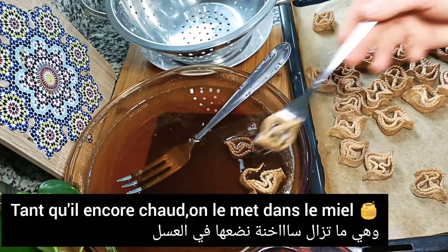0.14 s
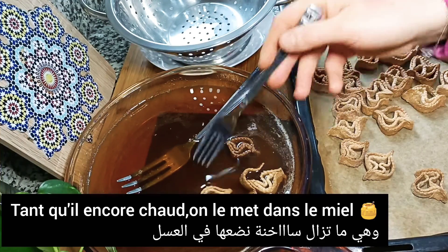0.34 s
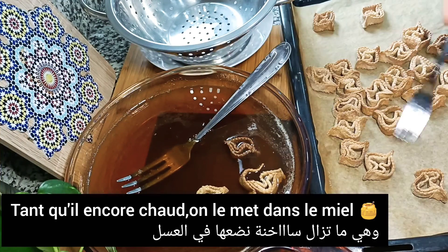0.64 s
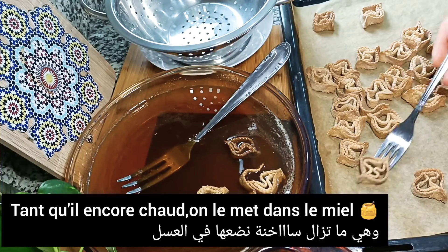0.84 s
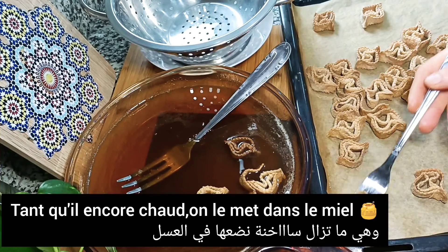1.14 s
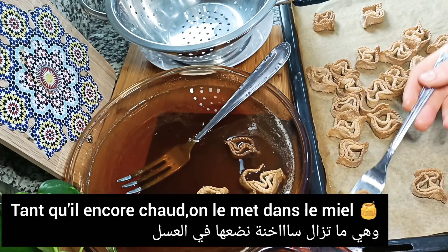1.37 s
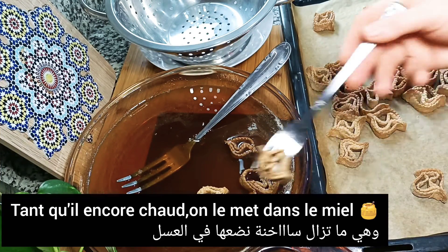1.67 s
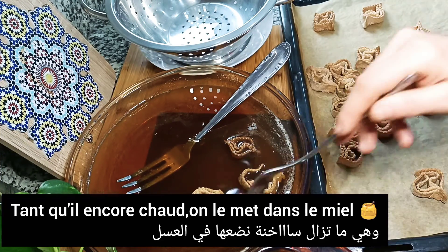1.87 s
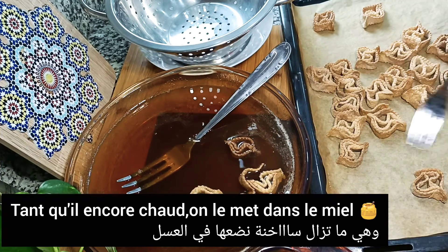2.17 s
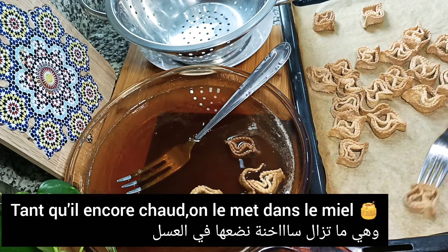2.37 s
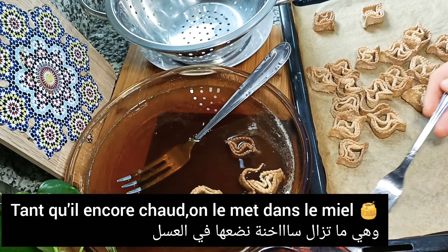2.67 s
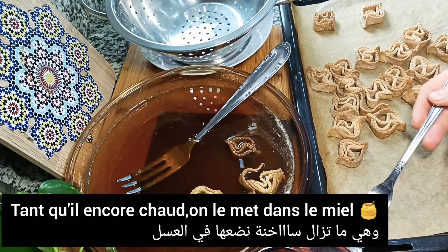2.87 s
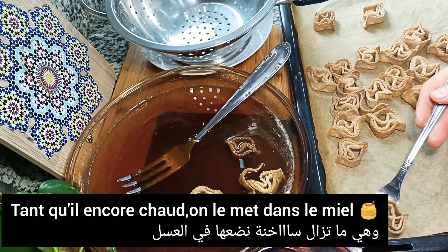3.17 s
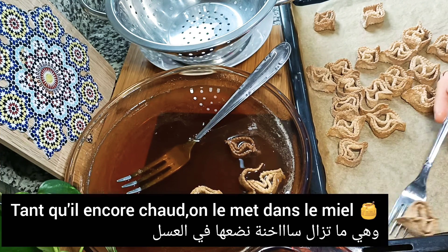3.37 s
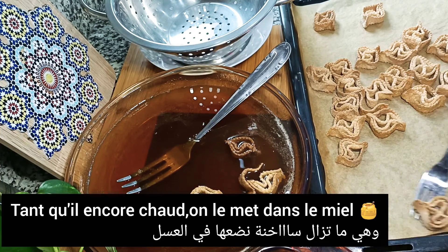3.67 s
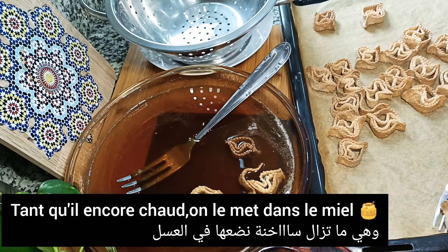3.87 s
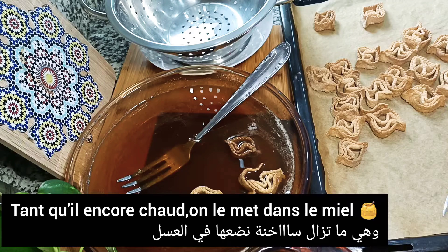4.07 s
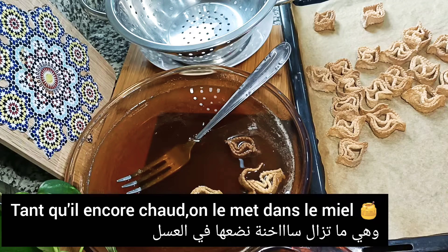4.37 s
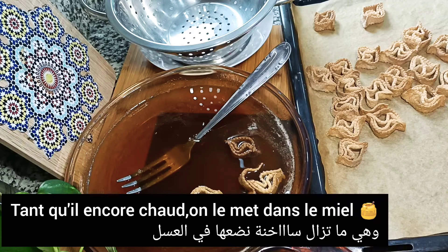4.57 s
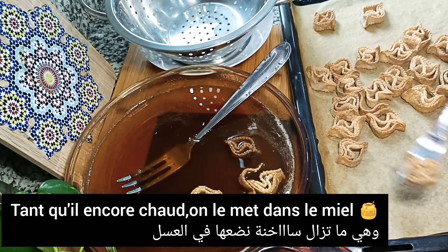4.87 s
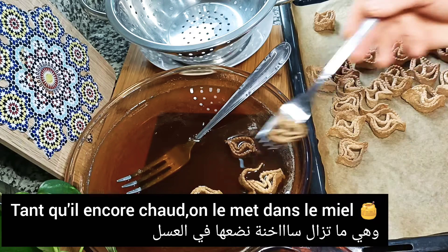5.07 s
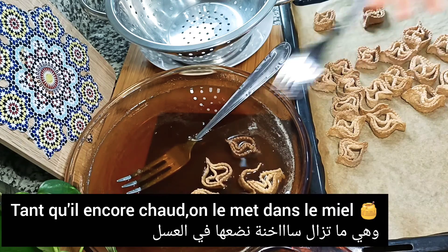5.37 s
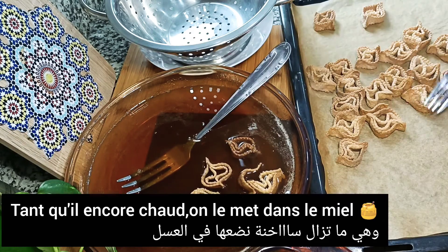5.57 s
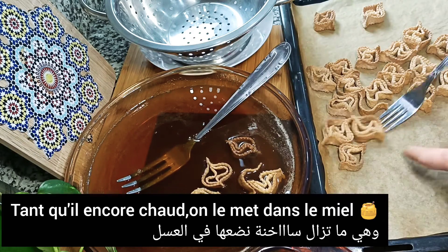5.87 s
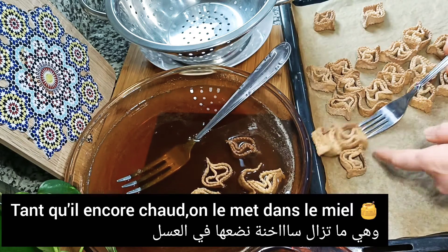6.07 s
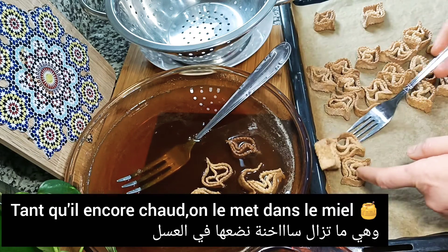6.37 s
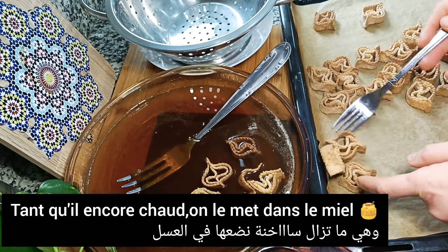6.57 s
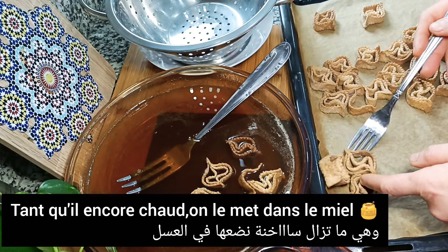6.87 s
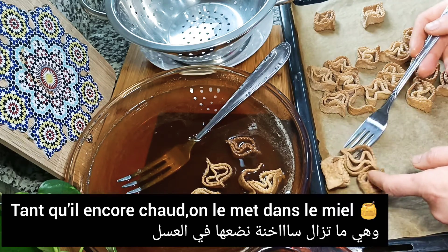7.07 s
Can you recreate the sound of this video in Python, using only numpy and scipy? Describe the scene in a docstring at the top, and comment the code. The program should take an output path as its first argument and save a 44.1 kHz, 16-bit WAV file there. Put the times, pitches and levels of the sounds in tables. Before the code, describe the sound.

A quiet small kitchen with faint low appliance hum and soft room noise, heard close in bright stereo. The first 0.7 s is almost silent but for a barely perceptible wet touch near 0.4. At 0.74 a fork knocks and scrapes a thin metal tray through parchment; the paper rustles, then snaps sharply from 1.1 to 1.4. Near quiet follows, with tiny ticks around 1.9. At 2.32 light fork clinks and a scrape begin a denser bout: crackling paper, hard crease snaps clustered around 2.85, then separate ticks, small clinks and tray bumps at 3.25, 3.6, 3.8 and 4.04. It falls quiet, with very faint falling chirps between 4.4 and 5.2. A soft sticky plop lands at 5.29. From 5.7 to 7.1 parchment rustles again with short scrapes, knocks and strong snaps at 6.1 and 6.43.

```python
"""A steel fork slides under pastries on a baking tray lined with parchment, close by in a quiet kitchen.
Paper: random fibre releases and facet flicks rustle; noise bursts snap.
Tines: friction-modulated noise and short blows drive tray modes; chatter bursts ring fork modes.
Pastries drop softly into honey as decaying noise; thin sine glides chirp.
An appliance hums (wavering sines) over low room noise."""
import sys
import numpy as np
from scipy import signal
from scipy.fft import rfft, irfft, next_fast_len
from scipy.io import wavfile

SR = 44100
rng = np.random.default_rng(int(sys.argv[2]) if len(sys.argv) > 2 else 0)


def digitize_waveform(pressure):
    """Quantize a signal to 16-bit integers and store it at the path in sys.argv[1].

    Rows of a 2-D input are taken as channels; values are limited to [-1, 1].
    """
    field = np.atleast_2d(pressure).T
    bounded = np.clip(field, -1, 1)
    quanta = np.round(bounded * 32767).astype(np.int16)
    wavfile.write(sys.argv[1], SR, quanta)


N = 317961
TIME = np.arange(N) / SR


def undb(db):
    """Decibels to amplitude gain."""
    return 10 ** (np.asarray(db) / 20)


def unit(x):
    """Scale to rms 1."""
    return x / np.sqrt(np.mean(x ** 2))


def colour(x, spectrum):
    """Filter by (frequency [Hz], gain [dB]) points, interpolated over log frequency."""
    hz, db = np.transpose(spectrum)
    size = next_fast_len(x.shape[-1] + 2048)
    bins_hz = np.maximum(np.fft.rfftfreq(size, 1 / SR), 1)
    gain = undb(np.interp(np.log(bins_hz), np.log(hz), db))
    return irfft(rfft(x, size) * gain, size)[..., :x.shape[-1]]


def split(x, crossover_hz):
    """Parts below and above a frequency; their sum has a flat magnitude response."""
    parts = []
    for kind in ("low", "high"):
        sos = signal.butter(4, crossover_hz, kind, fs=SR, output="sos")
        parts.append(signal.sosfilt(np.tile(sos, (2, 1)), x))
    return parts


def ring(x, response):
    """Convolve with an impulse response per channel."""
    return signal.fftconvolve(np.atleast_2d(x), response, axes=-1)[:, :x.shape[-1]]


def add(out, start_s, sound):
    """Mix a sound in at a time."""
    start = int(start_s * SR)
    out[..., start:start + sound.shape[-1]] += sound[..., :N - start]


def walk(knots_per_s):
    """Gaussian random knots joined by straight lines."""
    knots = rng.standard_normal(8192)
    return np.interp(TIME * knots_per_s, np.arange(len(knots)), knots)


def air(size, shared_hz):
    """Stereo noise whose long waves reach both ports alike."""
    mid, side = rng.standard_normal((2, size))
    side = signal.sosfilt(signal.butter(1, shared_hz, "high", fs=SR, output="sos"), side)
    return np.array([mid + side, mid - side]) / np.sqrt(2)


def slips(rate_hz, spread_db, grain_s):
    """Envelope of tiny releases at random moments: many weak, a few strong."""
    size = undb(spread_db * np.minimum(rng.exponential(size=N), 3.5))
    energy = (rng.random(N) < rate_hz / SR) * size ** 2
    decay = np.exp(-1 / (grain_s * SR))
    return unit(np.sqrt(signal.lfilter([1], [1, -decay], energy + 1e-12)))


def strokes(table, swell_share, fade_db_per_s):
    """Swell, hold and fade of strokes, summed in power: a base gain, then one per tint column."""
    power = 0
    for start_s, length_s, db, *tints_db in table:
        age_s = TIME - start_s
        swell = np.clip(age_s / (length_s * swell_share), 0, 1)
        fade_db = fade_db_per_s * np.maximum(age_s - length_s, 0)
        envelope = swell * undb(db - fade_db)
        power = power + np.outer(undb([0, *tints_db]), envelope) ** 2
    return np.sqrt(power)


# room noise spectrum: (frequency [Hz], relative density [dB])
KITCHEN_SPECTRUM = [(15, -51), (25, -17.5), (80, -16.5), (114, 1), (153, -18), (270, -5.5), (335, -17.5),
                    (451, -13.5), (591, -21.5), (641, -23), (3920, -35), (5730, -33.5), (8140, -48.5),
                    (11000, -43), (16000, -38)]
# appliance hum partials: (frequency [Hz], rms level [dB])
HUM_PARTIALS = [(60, -87), (100, -83.5), (116, -79), (265, -85), (305, -74)]


def kitchen(noise_db=-65.5, waver_db=1, hum_waver_rad=0.94):
    """Coloured noise of wavering level plus hum sines of wandering phase."""
    noise = unit(colour(air(N, shared_hz=600), KITCHEN_SPECTRUM))
    noise = noise * undb(noise_db + waver_db * walk(9.0))
    hum = 0
    for hz, db in HUM_PARTIALS:
        phase = 2 * np.pi * hz * TIME + hum_waver_rad * walk(20)
        hum = hum + undb(db) * np.sqrt(2) * np.sin(phase)
    return noise + hum


# honey slap spectrum: (frequency [Hz], relative density [dB])
HONEY_SPECTRUM = [(400, -11), (1200, -3), (1700, 6), (2400, 4), (3500, -16), (14000, -15)]
# pastries settling in the honey: (time [s], level [dB])
HONEY_DROPS = [(0.377, -68), (5.289, -46.5)]


def plops(level_db=-2, decay_s=0.011):
    """A soft wet slap on thick honey: coloured noise with exponential decay."""
    out, t = np.zeros((2, N)), TIME[:SR // 8]
    for start_s, db in HONEY_DROPS:
        slap = unit(colour(air(len(t), shared_hz=2000), HONEY_SPECTRUM))
        add(out, start_s, undb(db + level_db) * np.exp(-t / decay_s) * slap)
    return out


# parchment spectrum: (frequency [Hz], relative density [dB])
PAPER_SPECTRUM = [(150, -51.5), (400, -38), (750, -47.5), (1100, -19.5), (1700, -18), (2500, -8),
                  (3600, -3.5), (5000, 0), (6500, 8.5), (8200, -3), (10500, 1.5), (13000, -2), (15500, 3.5)]


def paper_bands(size):
    """Middle and top of the parchment's noise, each at rms 1."""
    noise = colour(air(size, shared_hz=2200), PAPER_SPECTRUM)
    return [unit(part) for part in split(noise, 7750)]


def facets(count=7000, low_hz=2800, high_hz=7200, decay_s=.0045):
    """Small stiff panels between the creases flick, each ringing very briefly at its own pitch."""
    out, t = np.zeros((2, N)), TIME[:SR // 50]
    for when, pitch, size, left, right in rng.random((count, 5)):
        hz = low_hz + pitch * (high_hz - low_hz)
        phase = 2 * np.pi * np.array([[left], [right]])
        tone = np.exp(-t / decay_s) * np.sin(2 * np.pi * hz * t + phase)
        add(out, when * TIME[-1], undb(9 * size) * tone)
    return unit(out)


# pushes crumpling the parchment:
# (time [s], length [s], level [dB], crispness = top band over middle [dB])
PAPER_PUSHES = [ (0.738, 0.023, -47, 3), (0.76, 0.19, -45.5, 6), (0.9, 0.19, -43.5, 2),
                (1.06, 0.077, -40, 1), (1.205, 0.12, -32, 1), (1.4, 0.019, -37.5, 4),
                (2.324, .012, -42, -9), (2.33, 0.22, -43, 7), (2.42, 0.12, -45, 10),
                (2.545, 0.064, -38, 6.5), (2.63, .1, -35.5, 5.5), (2.73, 0.14, -40.5, -0.5),
                (2.81, 0.094, -34, -4), (2.96, 0.11, -39, -1), (3.133, 0.012, -38, -0.5),
                (3.242, 0.012, -32.5, 0.5), (3.35, 0.11, -45.5, 2.5), (3.595, 0.011, -31, 4),
                (3.72, 0.071, -54, 7), (3.825, 0.0067, -36, 1.5), (3.908, 0.0067, -46.5, 3),
                (4.042, 0.08, -54.5, 5.5), (4.09, .17, -59, 6), (4.42, 0.054, -66.5, -1),
                (5.685, 0.024, -56, 9), (5.72, 0.13, -47.5, 7), (5.83, 0.13, -41.5, 5),
                (5.93, .13, -35, -1), (6.1, 0.12, -33.5, -0.5), (6.23, 0.053, -36.5, -2),
                (6.378, 0.044, -40, 4), (6.426, 0.012, -37.5, 1), (6.48, .18, -41.5, 1.5),
                (6.69, 0.18, -39, 1.5), (6.91, 0.034, -38.5, -4), (6.98, 0.21, -45.5, 2.5)]
PAPER_SWELL_SHARE, PAPER_FADE_DB_PER_S = 0.39, 248


def rustle(middle_db=1, waver_db=1.16):
    """Parchment fibres let go in swarms, with sparser crinkles and flicking facets among them."""
    gain, top_gain = strokes(PAPER_PUSHES, PAPER_SWELL_SHARE, PAPER_FADE_DB_PER_S)
    fibres = slips(rate_hz=2200, spread_db=2.5, grain_s=.0004)
    crinkles = .45 * slips(rate_hz=110, spread_db=1.8, grain_s=.001)
    releases = unit(np.hypot(fibres, crinkles))
    middle, top = (band * releases for band in paper_bands(N))
    middle = unit(middle + .68 * facets())
    waver = undb(waver_db * walk(60))  # the rustle's level wavers irregularly
    return waver * (gain * middle * undb(middle_db) + top_gain * top)


# tray spectrum: (frequency [Hz], relative density [dB])
SHEET_SPECTRUM = [(40, -17.5), (100, -35.5), (190, -5), (340, 1.5), (560, 7.5), (660, 0.5), (830, -16),
                  (940, 2), (1350, -7.5), (1620, -9), (2150, -2), (3200, -7), (4500, -9), (7000, -25.5),
                  (12000, -39.5)]


def sheet_bands(size):
    """Body, middle and edge of the tray's dense, quickly damped vibration, each at rms 1."""
    noise = colour(air(size, shared_hz=1100), SHEET_SPECTRUM)
    body, rest = split(noise, 830)
    middle, edge = split(rest, 1770)
    return [unit(body), unit(middle), unit(edge)]


# tines and pastry dragged over the tray: (time [s], length [s], level [dB],
# weight = body over middle [dB], edge = edge over middle [dB])
TRAY_DRAGS = [ (0.738, 0.031, -37.5, -14, 0), (0.79, 0.054, -40.5, -3, 4.5),
              (0.855, 0.037, -47.5, -0.5, 12), (0.962, 0.031, -52.5, -11, -6.5),
              (2.322, 0.088, -44.5, -4, 6), (2.412, .035, -45.5, -4, 7.5), (2.7, 0.022, -62.5, -11.5, 12),
              (3.355, 0.063, -57.5, -3.5, 2.5), (3.57, 0.053, -55.5, -19, 2),
              (3.608, 0.026, -43.5, -11, 4.5), (3.715, 0.015, -57.5, -20, 10.5),
              (4.22, 0.055, -68.5, -1, 9), (5.678, 0.019, -49, -4.5, -7.5), (5.715, 0.1, -49, -15, -3.5),
              (5.895, 0.1, -51, -4.5, 2.5), (6.02, 0.099, -59.5, -3, 14.5), (6.13, 0.049, -48.5, -12, 3),
              (6.255, .045, -46, -2, -15), (6.575, 0.038, -46.5, -8, -0.5), (6.615, .055, -49.5, -10, 1),
              (6.72, 0.064, -41, -12.5, 2.5), (6.79, 0.018, -45, -7, -13), (6.915, 0.025, -47.5, -1.5, -28),
              (7.02, 0.11, -61, -16, -7), (7.11, 0.068, -55.5, -22, 0)]
DRAG_SWELL_SHARE, DRAG_FADE_DB_PER_S = 0.21, 268.5


def drags(level_db=-2, judder_db=2):
    """The tines stick and slip: random releases shape three noise bands that judder separately."""
    middle, body, edge = strokes(TRAY_DRAGS, DRAG_SWELL_SHARE, DRAG_FADE_DB_PER_S)
    friction = slips(rate_hz=450, spread_db=2.5, grain_s=.001)
    scrape = 0
    for band, gain in zip(sheet_bands(N), (body, middle, edge)):
        scrape = scrape + band * gain * undb(level_db + judder_db * walk(70))
    return friction * scrape


# fork bumps the tray through the paper: (time [s], level [dB],
# weight = body over middle [dB], edge = edge over middle [dB], contact decay [s])
TRAY_KNOCKS = [(0.7407, -40, -5, 0, 0.008), (0.753, -28.5, -12, -7.5, 0.0066), (0.809, -40, 2, 6, 0.011),
               (0.82, -37, -6.5, -1, 0.033), (0.972, -45, -25, -15, .018), (1.468, -64, 8, -10, 0.023),
               (2.323, -54, 10, 17, 0.0097), (2.426, -39, -12, -9, 0.027),
               (3.2546, -37.5, -1.5, -23, 0.022), (3.619, -34, -10, 5, 0.0077),
               (3.913, -58, 2, -17, 0.0084), (4.044, -52.5, 1, -10, 0.018), (5.686, -49, -11.5, -12, 0.02),
               (6.263, -37, -22, -6, 0.011), (6.297, -46.5, 7, 8, 0.0053), (6.922, -38.5, -7, -31, 0.011)]


def knocks(rise_s=.0012):
    """Blows cushioned by the paper: soft rise, exponential decay, three noise bands."""
    out, t = np.zeros((2, N)), TIME[:SR // 4]
    for start_s, db, weight_db, edge_db, contact_s in TRAY_KNOCKS:
        body, middle, edge = sheet_bands(len(t))
        shape = (1 - np.exp(-t / rise_s)) * np.exp(-t / max(contact_s, .002))
        blow = undb(weight_db) * body + middle + undb(edge_db) * edge
        add(out, start_s, undb(db) * shape / shape.max() * blow)
    return out


# tray modes: (frequency [Hz], relative level [dB], t60 [s])
TRAY_MODES = [(355, -4, .2), (445, -5, .18), (532, -4, .25), (566, -3, .25), (942, -2, .24),
              (1030, -6, .16), (1091, -3, .25), (1264, -2, .2), (1305, -3, .16), (1523, 1, .2),
              (1788, -4, .16), (1895, -3, .14), (2054, -2, .12), (2208, -3, .1), (2466, -6, .14),
              (3005, 1, .16), (3100, -5, .1), (3266, -3, .12), (3635, -7, .1)]


def tray_ring(force, ring_db=7.5, wander_db=6):
    """Tray resonators; coupling to each wanders as the tines cross its nodes and crests."""
    out = 0
    for hz, db, t60_s in TRAY_MODES:
        pole = np.exp((2j * np.pi * hz - np.log(1000) / t60_s) / SR)
        coupling = undb(ring_db + db + wander_db * np.tanh(walk(11)))
        out = out + signal.lfilter([2 * (1 - abs(pole))], [1, -pole], force * coupling).real
    return out


# dry ticks, mostly creases snapping over:
# (time [s], level [dB], crispness = top band over middle [dB])
CREASE_SNAPS = [ (1.0766, -26, 1.5), (1.2273, -27, 2), (1.2826, -23, -12), (1.317, -23.5, 6),
                (1.3249, -23.5, -15), (1.4052, -41.5, 10.5), (1.8508, -51, -1), (1.886, -54.5, 3.5),
                (2.6057, -30, -1.5), (2.832, -24.5, -4), (2.8505, -24, 1), (2.859, -28, -1),
                (2.8747, -19, 1.5), (2.9899, -30, 0), (3.0162, -29, 3), (3.034, -28, -5),
                (3.0785, -27, -1.5), (3.141, -32.5, 5), (3.178, -32.5, 0.5), (3.249, -26.5, 7.5),
                (3.407, -37, -2), (3.428, -33, 1), (3.4649, -24.5, -2), (3.602, -31, 6.5),
                (3.6083, -23, -14), (3.83, -25, 3.5), (4.045, -45.5, 16), (5.7041, -33.5, 5),
                (5.832, -37.5, 8.5), (5.8875, -34, 10.5), (5.976, -27, -2), (6.0017, -26.5, -4),
                (6.1039, -21.5, 1), (6.177, -29.5, 9), (6.4304, -19, -2.5), (6.5007, -39.5, 11),
                (6.568, -41.5, 12), (6.822, -30, 7), (6.874, -33, 1.5), (6.932, -30, -11),
                (6.9855, -30.5, 1.5)]


def snaps(buckle_s=0.005, after_db=-23, after_s=0.011):
    """A crease buckles in a burst of a few milliseconds; the sheet shivers afterwards."""
    out, t = np.zeros((2, N)), TIME[:SR // 8]
    age = t / buckle_s
    shiver = undb(after_db) * np.exp(-t / after_s)
    shape = np.minimum(4 * age, 1) * (np.exp(-age ** 3) + shiver)
    for start_s, db, crisp_db in CREASE_SNAPS:
        middle, top = paper_bands(len(t))
        add(out, start_s, undb(db) * shape * (middle + undb(crisp_db) * top))
    return out


def modes(table):
    """Impulse response of unit energy; each port hears a high mode in its own phase."""
    t = TIME[:SR // 2]
    out = 0
    for hz, db, t60_s in table:
        phase = rng.uniform(-1.8, 1, (2, 1)) * min(hz / 2500, 2)
        tone = undb(db - 60 * t / t60_s) * np.cos(2 * np.pi * hz * t + phase)
        out = out + tone / np.sqrt(t60_s)  # table level sets mode energy
    return unit(out) / np.sqrt(len(t))


# hand-held fork modes: (frequency [Hz], relative energy [dB], t60 [s])
FORK_MODES = [(571, -2, .2), (1093, -3, .28), (1776, -9, .18), (2611, -8, .16), (3170, -4, .08),
              (3270, -6, .14), (3410, -5, .06), (3650, -1, .06), (4366, -9, .12), (4540, -6, .08),
              (4630, -1, .15), (4715, 0, .14), (4813, -3, .13), (4960, -5, .08), (5120, -7, .08),
              (5700, -5, .12), (6072, -8, .18), (6310, -5, .07), (6560, -2, .16)]
# blows that ring the fork:
# (time [s], level [dB], pitch favoured by the contact point [Hz], chatter decay [s])
FORK_CLINKS = [(2.3245, -33.5, 3600, 0.0037), (2.330, -30, 3520, 0.0022), (3.254, -35.5, 4600, 0.0037),
               (3.255, -41, 740, 0.0048), (3.378, -40, 6600, 0.0058), (3.380, -53, 1100, 0.012),
               (3.428, -47, 6540, 0.0027), (3.465, -54, 5900, .003), (3.609, -33, 3240, 0.0062),
               (3.619, -43.5, 604, 0.014), (3.829, -40.5, 5800, 0.0011), (3.911, -45.5, 2970, 0.0028),
               (4.044, -42, 4670, 0.0029), (4.045, -56, 1460, 0.0034), (4.064, -55, 4350, 0.0056)]


def clinks(focus_db_per_octave=18):
    """The tines chatter and the fork rings; each point of contact favours other modes."""
    out, t = np.zeros((2, N)), TIME[:SR // 3]
    for start_s, db, favoured_hz, chatter_s in FORK_CLINKS:
        favoured = []
        for hz, mode_db, t60_s in FORK_MODES:
            octaves_off = abs(np.log2(hz / favoured_hz))
            favoured.append((hz, mode_db - focus_db_per_octave * octaves_off, t60_s))
        response = modes(favoured)
        chatter = rng.standard_normal(len(t)) * np.exp(-t / max(chatter_s, .001))
        tone = ring(chatter, response)
        add(out, start_s, undb(db) * tone / tone[:, :SR // 50].std())  # level over the first 20 ms
    return out


# faint falling chirps, perhaps a bird outside:
# (time [s], start [Hz], end [Hz], length [s], level [dB])
FALLING_CHIRPS = [(4.37, 4600, 3300, 0.067, -71.5), (4.845, 7760, 6870, 0.075, -72),
                  (5.008, 5960, 5000, 0.055, -73.5), (5.19, 5920, 5030, 0.039, -74.5)]


def chirps():
    """Thin whistles: sines gliding down under a bell-shaped envelope."""
    out = np.zeros(N)
    for start_s, start_hz, end_hz, length_s, db in FALLING_CHIRPS:
        hz = np.linspace(start_hz, end_hz, int(length_s * SR))
        whistle = np.sin(2 * np.pi * np.cumsum(hz) / SR)
        add(out, start_s, undb(db) * np.hanning(len(hz)) * whistle)
    return out


def diffuse(t60_s, shared_hz):
    """Dense decaying response of unit energy, alike in both channels at low pitch."""
    t = TIME[:SR // 2]
    return unit(air(len(t), shared_hz) * undb(-60 * t / t60_s)) / np.sqrt(len(t))


# colour of the two microphone ports: (frequency [Hz], gain [dB])
LEFT_PORT_CURVE = [(100, 1.5), (200, -3), (350, -3), (800, -6), (2500, -1), (4800, -3), (5900, -5),
                   (6700, -0.5), (7150, -7), (7700, -15), (9000, -6.5), (11000, -2), (14000, 7),
                   (15500, 6.5)]
RIGHT_PORT_CURVE = [(100, 1), (200, -7), (350, -9), (800, -6.5), (2500, -2.5), (4000, -3), (5300, -2.5),
                    (6200, -8), (7200, -20.5), (9000, -6.5), (11000, -0.5), (13300, 6.5), (14600, -3.5),
                    (15700, -15)]


def scene(paper_on_tray_db=-9, room_t60_s=0.23, room_db=-8):
    """Paper, tray and fork in a small hard room, heard through two ports."""
    contact = drags() + knocks()
    paper = rustle() + snaps()
    # the tray rings under the fork, and a little under the paper that lies on it
    force = contact + undb(paper_on_tray_db) * paper
    tray = contact + tray_ring(force)
    # thin metal and paper radiate almost no bass
    _, sheets = split(paper + tray + clinks(), 90)
    near = sheets + plops() + chirps()
    wall_curve = [(200, -11), (5000, 5.5), (9000, 3.5), (15000, -4)]  # (frequency [Hz], gain [dB])
    walls = colour(diffuse(room_t60_s, shared_hz=710), wall_curve)
    left, right = near + undb(room_db) * ring(near, walls)
    ports = np.array([colour(left, LEFT_PORT_CURVE), colour(right, RIGHT_PORT_CURVE)])
    return ports + kitchen()


def record(dry, rumble_hz=42, top_hz=15900):
    """The phone cuts the rumble and the top of the band."""
    lean = signal.sosfilt(signal.butter(2, rumble_hz, "high", fs=SR, output="sos"), dry)
    return signal.sosfilt(signal.ellip(10, .2, 70, top_hz, fs=SR, output="sos"), lean)


dry = scene()
out = record(dry)
digitize_waveform(out)
```